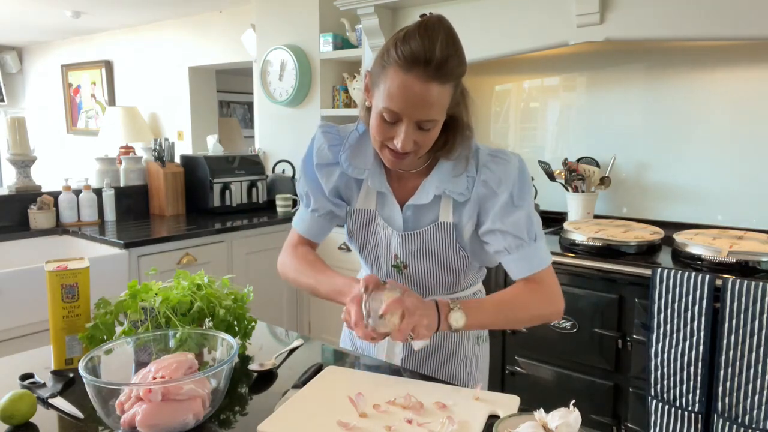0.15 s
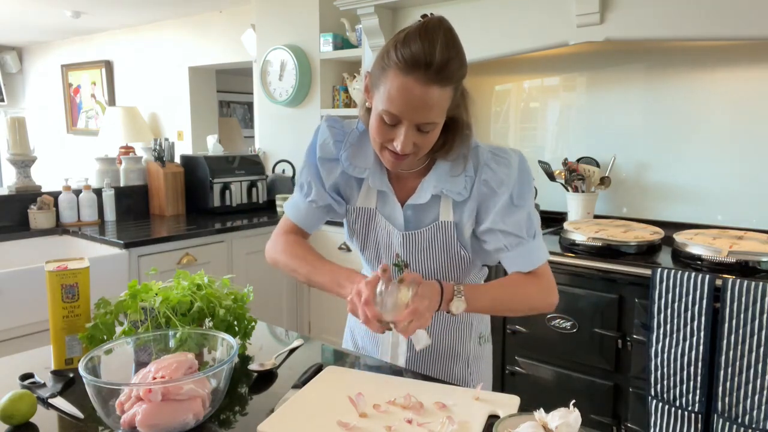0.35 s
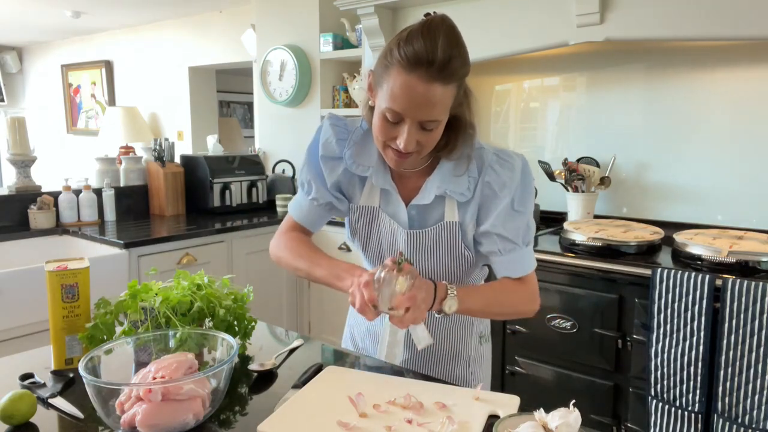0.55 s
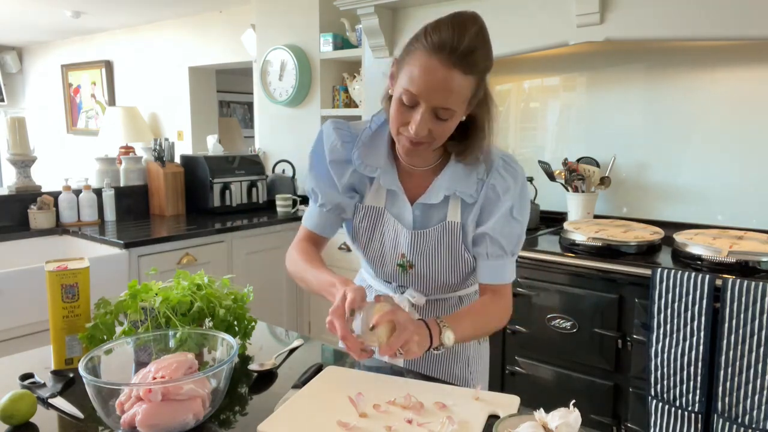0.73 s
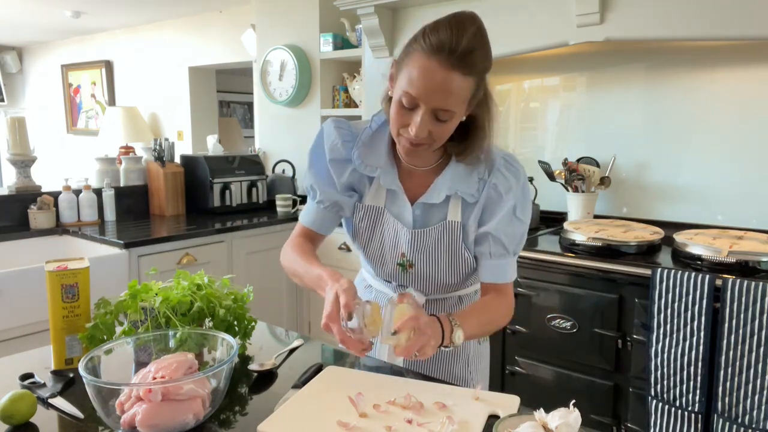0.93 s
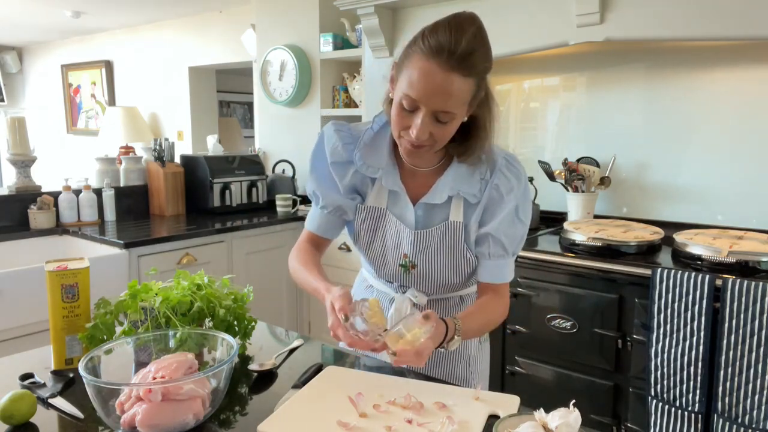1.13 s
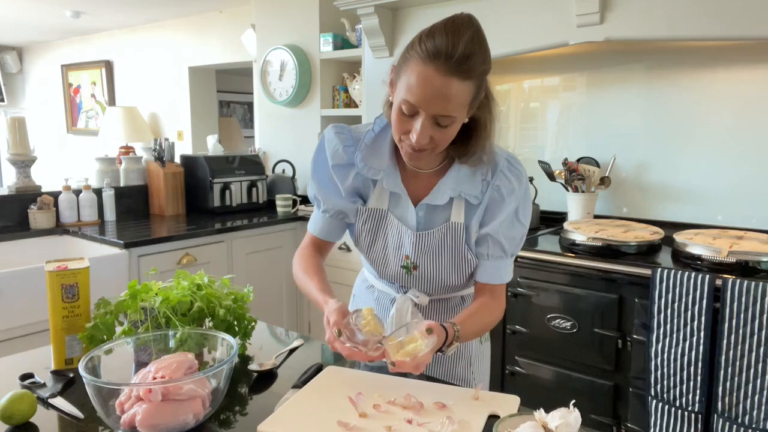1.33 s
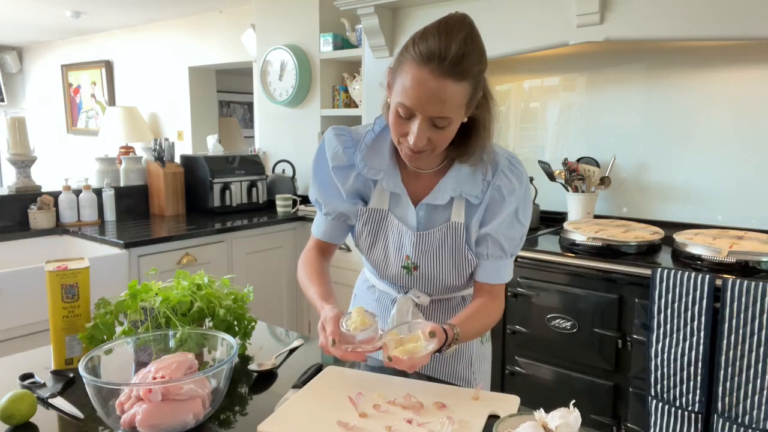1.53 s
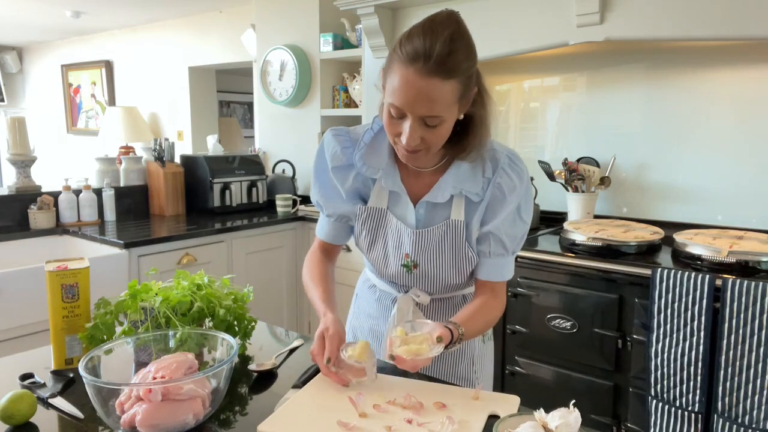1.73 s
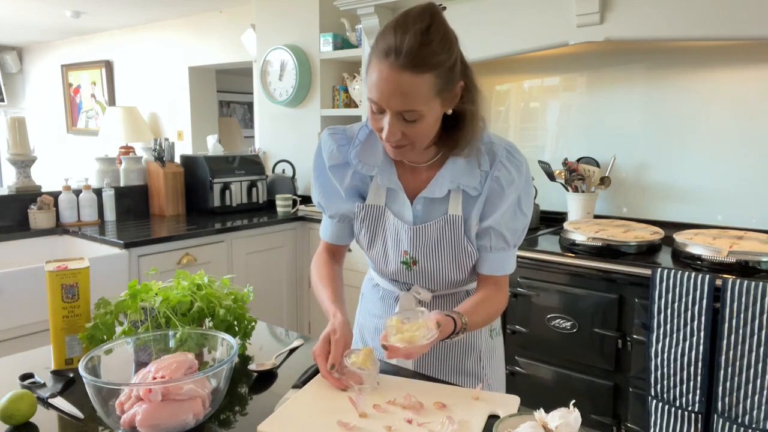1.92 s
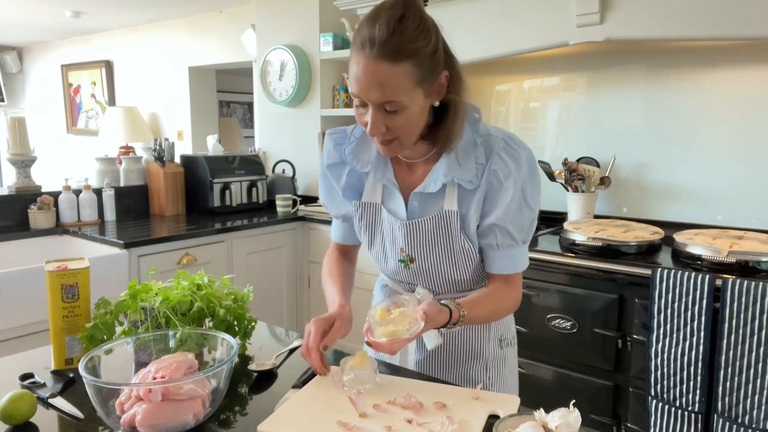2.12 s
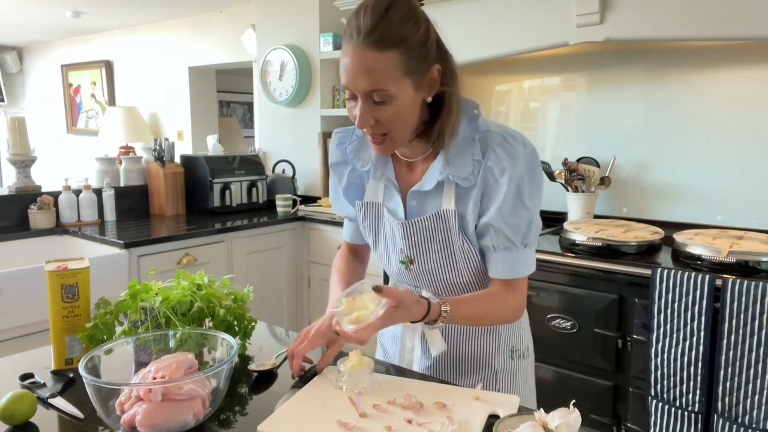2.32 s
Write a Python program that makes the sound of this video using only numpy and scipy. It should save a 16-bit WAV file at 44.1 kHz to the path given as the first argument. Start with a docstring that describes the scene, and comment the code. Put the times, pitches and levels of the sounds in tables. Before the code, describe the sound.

Plastic garlic crusher rubbing and clicking, then set down with a sharp knock in a kitchen.

```python
"""Garlic grinder on a worktop

A two-part plastic garlic grinder is twisted in the hands, pulled apart, and one half is set down hard.
The halves rub in grains of friction, thud dully and tick their teeth. The cup knocks and rocks on the
stone, each contact ringing its modes, and the kitchen answers with reverb and boom over a low hum."""
import sys
import numpy as np
from scipy import signal
from scipy.fft import rfft, irfft
from scipy.io import wavfile

SR = 44100
rng = np.random.default_rng(int(sys.argv[2]) if len(sys.argv) > 2 else 0)


def dump(signal):
    """Clip the signal to [-1, 1] and save it as 16-bit WAV at the path in sys.argv[1]."""
    limited = np.clip(np.atleast_2d(signal).T, -1, 1)
    pcm = np.round(limited * 32767).astype(np.int16)
    wavfile.write(sys.argv[1], SR, pcm)


N = 108618


def from_db(db):
    return 10 ** (np.asarray(db) / 20)


def unit_rms(x):
    return x / np.sqrt(np.mean(x ** 2) + 1e-20)


def at_hz(curve, hz):
    """Read a curve along a log frequency axis."""
    points_hz, values = np.transpose(curve)
    return np.interp(np.log(np.maximum(hz, 1)), np.log(points_hz), values)


def fader(points):
    """A gain ride through (time, level) points, silent outside them."""
    times, db = np.transpose(points)
    return from_db(np.interp(np.arange(N) / SR, times, db, left=-200, right=-200))


def impulse(length):
    return np.eye(1, length)[0]


def lowpass(x, hz):
    return signal.sosfilt(signal.butter(2, hz, fs=SR, output="sos"), x)


def ring(drive, hz, t60):
    """One resonance: a unit click starts a sine of height 1 that falls 60 dB in t60 seconds."""
    radius, angle = from_db(-60 / (t60 * SR)), 2 * np.pi * hz / SR
    return signal.lfilter([0, np.sin(angle)], [1, -2 * radius * np.cos(angle), radius ** 2], drive + 1e-18)


def coloured(white, eq):
    """White noise through an EQ curve, at unit rms."""
    size = white.shape[-1]
    hz = np.arange(size // 2 + 1) * SR / size
    return unit_rms(irfft(rfft(white) * from_db(at_hz(eq, hz)), size))


def stereo(mid, side, correlation):
    """Blend two independent noises into a left and right of the given correlation."""
    return np.sqrt((1 + correlation) / 2) * mid + np.sqrt((1 - correlation) / 2) * side * [[1], [-1]]


def place(out, start_s, sound):
    start = int(start_s * SR)
    out[start:start + len(sound)] += sound[:len(out) - start]


# Bass-heavy noise bed of the room: (frequency [Hz], level [dB])
BED_EQ = [(15, -66.5), (32, -26), (50, -3), (110, -23.5), (310, -27), (600, -29.5), (950, -40), (1200, -40),
          (4000, -47), (13000, -53.5), (15000, -75.5)]
# Stereo image of the bed: (frequency [Hz], left-right correlation [0-1])
BED_CORRELATION = [(40, 0.72), (300, 0.27), (1500, 0.096), (8000, 0.35)]
# Wavering hums: (pitch [Hz], bandwidth [Hz], level [dB])
HUM_BANDS = [(47.3, 6, -64.5), (74, 5.1, -91), (319.6, 12, -76.5), (460.4, 14, -82)]


def room_tone(bed_db=-62, appliance_hz=476, appliance_db=-69, lean_left_db=0.5):
    """A steady noise bed, narrow bands of noise that waver as hums, and an appliance's pure tone."""
    mid, side = rfft(coloured(rng.standard_normal((2, N)), BED_EQ))
    correlation = at_hz(BED_CORRELATION, np.arange(len(mid)) * SR / N)
    out = from_db(bed_db) * irfft(stereo(mid, side, correlation), N)
    for hz, width_hz, db in HUM_BANDS:
        t60 = np.log(1000) / np.pi / width_hz
        hum = ring(rng.standard_normal(N + SR), hz, t60)[SR:]   # skip the build-up
        out += from_db(db) * unit_rms(hum)
    out += from_db(appliance_db) * np.sqrt(2) * np.sin(2 * np.pi * appliance_hz * np.arange(N) / SR)
    return out * from_db([[lean_left_db / 2], [-lean_left_db / 2]])


# Decay of the kitchen: (frequency [Hz], t60 [s])
REVERB_DECAY = [(60, 0.54), (160, 0.75), (420, 0.48), (1100, 0.32), (2900, 0.37), (7700, 0.32),
                (14000, 0.57)]
# Tone of its tail: (frequency [Hz], level [dB])
REVERB_EQ = [(60, -1.5), (300, 6), (1000, -2.5), (3000, -2), (4500, -7), (7000, -3.5), (8300, -23.5),
             (14000, -25)]


def kitchen_reverb(send, fade_in_s=0.003, correlation=0.23):
    """Dense reflections: a wide tail of noise, each half-octave dying at its own rate."""
    t = np.arange(SR * 3 // 4) / SR
    edges_hz = 45 * 2 ** np.arange(0, 8.6, .5)
    white = rng.standard_normal((2, 2, len(t)))
    mid_side = np.zeros((2, len(t)))
    for k, (low, high) in enumerate(zip(edges_hz, edges_hz[1:])):
        band = signal.sosfilt(signal.butter(2, [low, high], "band", fs=SR, output="sos"), white[k % 2])
        centre_hz = np.sqrt(low * high)
        t60 = at_hz(REVERB_DECAY, centre_hz)
        decay_energy = t60 * SR / (6 * np.log(10))
        mid_side += band * from_db(at_hz(REVERB_EQ, centre_hz) - 60 * t / t60) / np.sqrt(decay_energy)
    tail = stereo(*mid_side, correlation) * np.clip(t / fade_in_s, 0, 1)
    return signal.fftconvolve(send[None], tail, axes=1)[:, :N]


# Fader ride of the gripping hands: (time [s], level [dB])
GRIP_RIDE = [(0, -60), (.1, -54), (.15, -64.5), (.2, -53.5), (.27, -54), (.35, -69), (.45, -56.5),
             (.5, -69), (.6, -60.5), (.7, -71), (.78, -63.5), (.86, -54.5), (.96, -90), (1.1, -76),
             (1.2, -85)]
# Their muffled tone: (frequency [Hz], level [dB])
GRIP_EQ = [(60, -24), (130, -16.5), (300, -7), (550, -9.5), (1000, -16.5), (2000, -31.5)]


def grip_rustle():
    """The hands rustle low as they hold and twist the plastic."""
    return fader(GRIP_RIDE) * coloured(rng.standard_normal(N), GRIP_EQ)


# Two fader rides, the twist and then the scuff, each: (time [s], level [dB])
FRICTION_RIDES = [
    [(0.0, -52.5), (0.04, -63), (0.09, -47), (0.13, -47), (0.136, -68), (0.146, -51), (0.176, -48),
     (0.182, -39), (0.187, -32.5), (0.196, -39.5), (0.352, -68), (0.376, -51.5), (0.43, -46.5), (0.5, -67),
     (0.59, -47), (0.599, -41), (0.64, -50), (0.692, -48), (0.724, -72.5), (0.794, -65), (0.806, -42.5),
     (0.818, -49), (0.96, -103)],
    [(2.17, -57), (2.18, -78), (2.204, -31), (2.242, -50), (2.294, -59.5), (2.3, -57), (2.4, -71.5),
     (2.42, -74.5), (2.438, -61.5), (2.454, -58), (2.46, -55)],
]
# Tone of the halves rubbing together: (frequency [Hz], level [dB])
TWIST_EQ = [(150, -51), (600, 8), (1500, -7.5), (2200, 4.5), (4500, 7.5), (7500, 14), (11000, 1),
            (13500, -2.5), (15500, -65)]
# Faint ring of the shell, relative to the rub: (pitch [Hz], level [dB])
SHELL_MODES = [(2140, -20), (3050, -19), (4700, -21), (6080, -37)]
# Brighter tone of the scuff on the worktop: (frequency [Hz], level [dB])
SCUFF_EQ = [(1500, -6.5), (4000, -8.5), (6300, 2), (7700, 3), (11500, -5), (14000, -25.5), (15800, -25)]


def friction(grain_samples=64, grain_db=2.2, shell_t60=.015):
    """Dense, uneven grains of friction: the halves twist, and later the cup scuffs the stone."""
    white = rng.standard_normal(N)
    boost_db = grain_db * rng.exponential(1, N // grain_samples + 1)
    grains = white * from_db(boost_db.repeat(grain_samples)[:N])
    rub = coloured(grains, TWIST_EQ)
    shell = sum(from_db(db) * unit_rms(ring(rub, hz, shell_t60)) for hz, db in SHELL_MODES)
    twist_ride, scuff_ride = FRICTION_RIDES
    return fader(twist_ride) * unit_rms(rub + shell) + fader(scuff_ride) * coloured(grains, SCUFF_EQ)


# Dull thuds of the halves, and the room's low boom after bumps and knocks:
# (time [s], level [dB], pitch [Hz], t60 [s])
THUD_AND_BOOM_CUES = [(0.381, -36, 334, 0.036), (.391, -25.5, 467, 0.0093), (0.404, -28.5, 470, 0.012),
                      (0.4083, -35.5, 313, 0.049), (0.419, -38.5, 434, 0.05), (.432, -28.5, 427, 0.0086),
                      (0.594, -46, 433, 0.049), (.632, -50, 451, 0.17), (0.7, -51, 85, 0.22),
                      (0.804, -37, 710, 0.017), (0.8066, -27.5, 174, 0.042), (.81, -29, 650, 0.0065),
                      (0.821, -41.5, 470, 0.05), (0.834, -37.5, 405, 0.023), (0.868, -41.5, 72.1, 0.33),
                      (1.788, -28, 79.1, 0.16), (2.168, -35.5, 75.7, 0.51), (2.271, -33.5, 70, 0.31),
                      (2.301, -33, 404, 0.052)]


def thuds_and_booms():
    """One soft ring each: short for a thud of the halves, long and deep for the room mode near 75 Hz."""
    out = np.zeros(N)
    for start_s, db, hz, t60 in THUD_AND_BOOM_CUES:
        soft_ring = lowpass(ring(impulse(16384), hz, t60), 2 * hz)
        place(out, start_s, from_db(db) * soft_ring)
    return out


# Tooth ticks and small taps: (time [s], level [dB], pitch [Hz], t60 [cycles])
TICK_CUES = [(0.109, -46, 3100, 50), (0.135, -22, 7200, 34), (0.136, -37, 15000, 23),
             (0.136, -27, 10500, 7.2), (0.1397, -36, 11300, 21), (.1845, -24, 11600, 13),
             (.174, -38, 6500, 18), (0.3, -39, 12400, 5), (.361, -45, 12000, 5.1), (0.381, -41, 3500, 5),
             (.552, -52, 3250, 32), (.575, -43, 3100, 9.5), (0.598, -40.5, 4780, 50),
             (0.597, -25, 6900, 20), (0.805, -31.5, 3300, 7.2), (.81, -31.5, 3400, 5.1),
             (1.051, -58.5, 1730, 29), (1.052, -62, 1300, 17), (1.255, -67, 1900, 20),
             (1.354, -62, 950, 26), (1.354, -64.5, 1900, 44), (1.448, -49.5, 5800, 9.7),
             (2.204, -17, 11300, 6.9), (2.302, -33.5, 4360, 4.2), (2.36, -41, 3600, 5.5),
             (2.419, -43, 4200, 5.2), (2.452, -27, 5280, 5.9), (2.455, -27, 6100, 6.5)]


def tooth_ticks():
    """Each catch of the teeth or light tap gives one short, high ring."""
    out = np.zeros(N)
    for start_s, db, hz, cycles in TICK_CUES:
        t60 = cycles / hz
        ping = ring(impulse(2048), hz, t60)
        tick = ring(ping, hz, t60 / 2)   # rounds the attack
        place(out, start_s, from_db(db) * tick / np.abs(tick).max())
    return out


# Modes of the cup and the worktop under it, in bands 0-3, low to top: (pitch [Hz], level [dB], t60 [s])
CUP_MODES = {0: [(150, -14.5, 0.012), (226.5, -15.5, 0.028), (282, -16.5, 0.013), (432.5, -11, 0.024),
             (550, -5.5, 0.02), (633, -4, .03), (699, -3.5, 0.026)], 1: [(818, -6.5, 0.022),
             (970, -2, 0.025), (1096, -11, 0.044), (1258, -11, 0.027)], 2: [(1491, -7, 0.024),
             (1690, -7, 0.021), (1903, -5.5, 0.027), (2164, -6, 0.011), (2485, -6.5, 0.013),
             (2977, -5, 0.0038)], 3: [(3920, 9.5, 0.0037), (4720, 3.5, 0.0069), (6230, 2, 0.0038),
             (7940, -7.5, 0.0045), (11300, -1, 0.0044), (14920, -14, .0015)]}
# Hits of the cup, with a level for each band: (time [s], low [dB], mid [dB], high [dB], top [dB])
KNOCK_CUES = [(.1085, -36, -45, -48, -49.5), (.156, -71.5, -42, -75, -64), (.1845, -26, -26.5, -22, -36.5),
              (.217, -38.5, -66, -61, -71), (1.7705, -52, -31.5, -27, -48), (1.7749, -31, 1, 1.5, -17),
              (1.780, -17.5, -5.5, -1.5, -28.5), (1.7824, -12, -21, -2.5, -32.5),
              (1.8792, -32, -19, -36, -67), (2.1344, -22, -30, -58, -78),
              (2.1391, -16.5, -12, -11.5, -51.5), (2.1411, -17.5, -12.5, -10.5, -28.5),
              (2.191, -9.5, -13.5, -27, -44), (2.1946, -14.5, -17, -19, -41.5),
              (2.2276, -19, -19.5, -24.5, -60), (2.2335, -38, -38, -28.5, -57),
              (2.252, -25.5, -62, -49, -57), (2.27, -63.5, -34.5, -45, -73)]


def cup_knocks(contact_hz=9600, spread_db=2.0):
    """Each contact is a slightly soft click that strikes every mode of the cup with its own strength."""
    out = np.zeros(N)
    click = lowpass(impulse(4096), contact_hz)
    modes = [(band, *mode) for band, rows in CUP_MODES.items() for mode in rows]
    for start_s, *band_db in KNOCK_CUES:
        for k, (band, hz, mode_db, t60) in enumerate(modes):
            strength = from_db(band_db[band] + mode_db + spread_db * rng.standard_normal())
            polarity = (-1) ** k
            place(out, start_s, polarity * strength * ring(click, hz, t60))
    return out


# High shelf that shades the left side: (frequency [Hz], gain [dB])
LEFT_EQ = [(1300, 0), (3000, -2.5), (15000, -2.5)]


def scene(left_lag_s=.000063, lean_left_db=2):
    """The grinder up close, over reverb and room tone; its left side is a touch later and duller."""
    layers = np.array([cup_knocks(), thuds_and_booms(), tooth_ticks(), friction() + grip_rustle()])
    sends_db = [-2.5, -8, -13, -15]   # reverb send of each layer
    direct = layers.sum(axis=0)
    hz = np.arange(N // 2 + 1) * SR / N
    lag = np.exp(-2j * np.pi * hz * left_lag_s)
    left = irfft(rfft(direct) * from_db(at_hz(LEFT_EQ, hz)) * lag, N)
    reverb = kitchen_reverb(from_db(sends_db) @ layers)
    mix = np.array([left, direct]) + reverb + room_tone()
    return mix * from_db([[lean_left_db / 2], [-lean_left_db / 2]])


def record(dry, low_cut_hz=40, ceiling=1.6, high_cut_hz=16700):
    """Master chain: rumble cut, soft saturation, steep high cut, hard clip."""
    tight = signal.sosfilt(signal.butter(4, low_cut_hz, "high", fs=SR, output="sos"), dry)
    rounded = ceiling * np.tanh(tight / ceiling)
    trimmed = signal.sosfilt(signal.cheby2(12, 70, high_cut_hz, fs=SR, output="sos"), rounded)
    return np.clip(trimmed, -1, 1)


dry = scene()
out = record(dry)
dump(out)
```